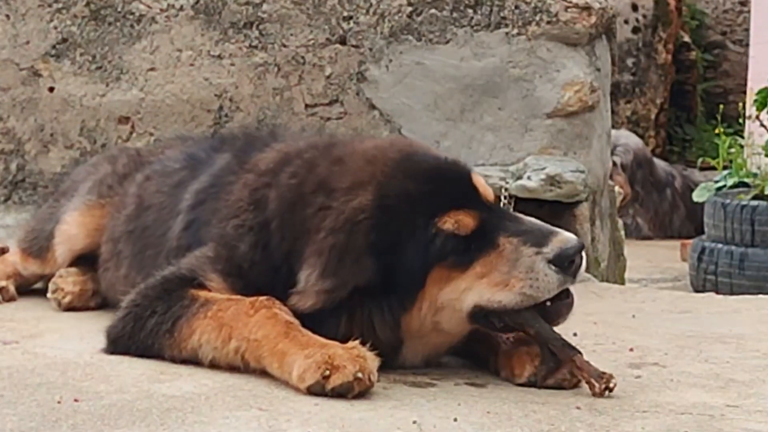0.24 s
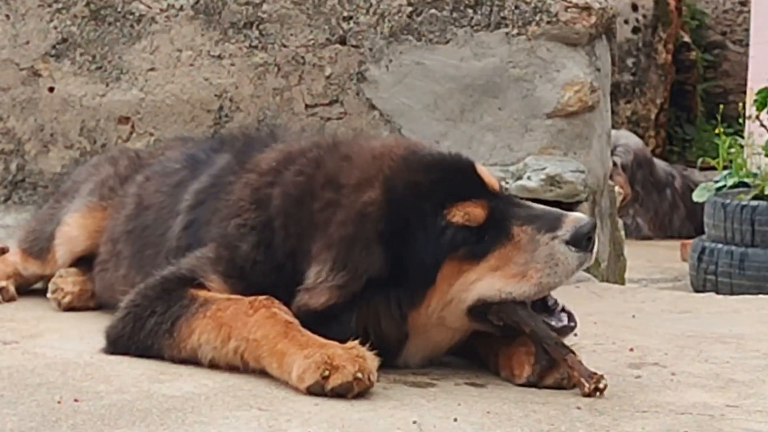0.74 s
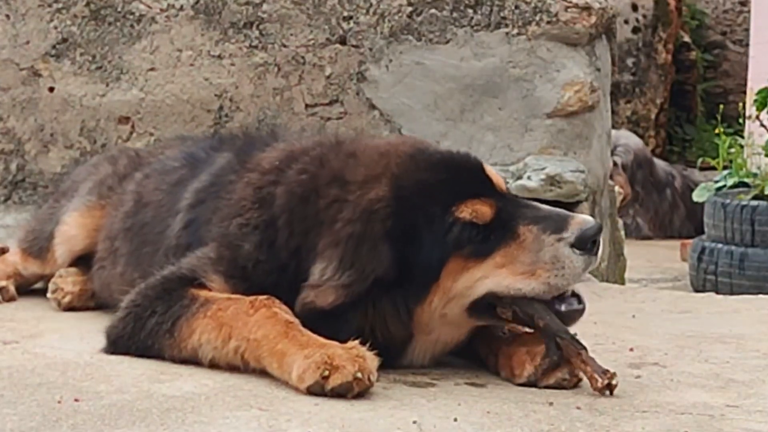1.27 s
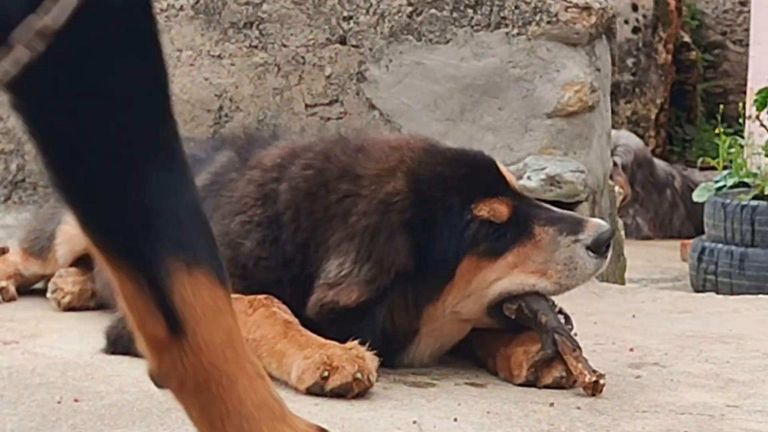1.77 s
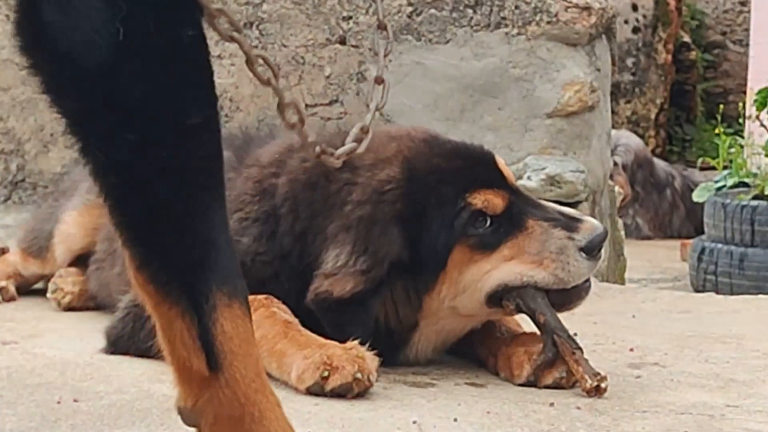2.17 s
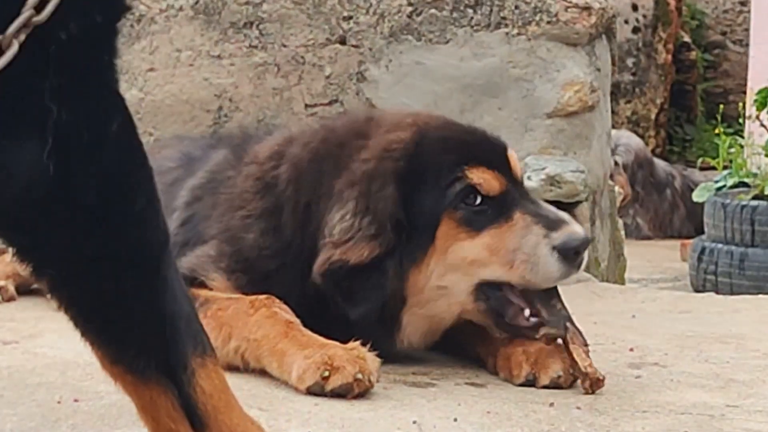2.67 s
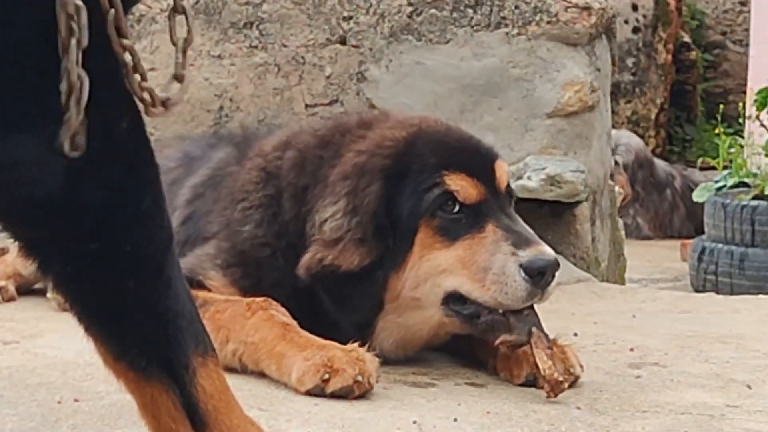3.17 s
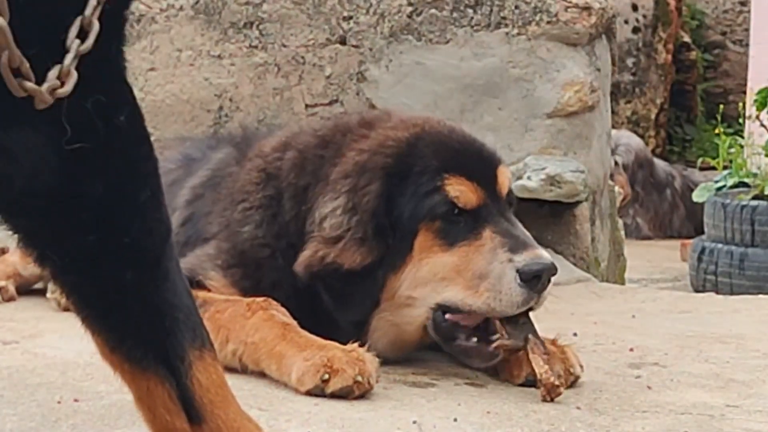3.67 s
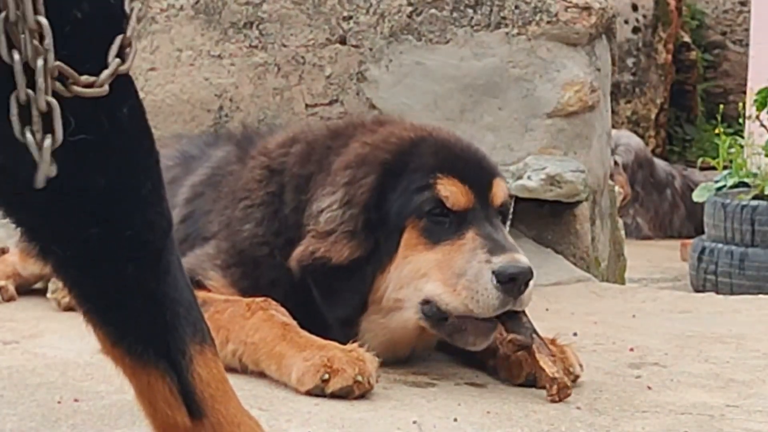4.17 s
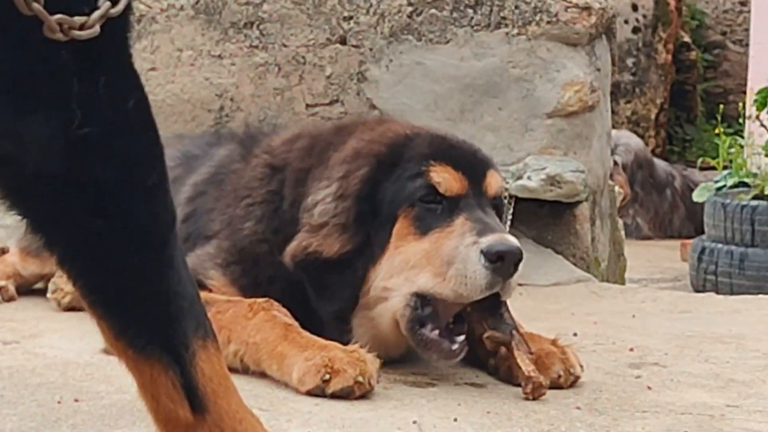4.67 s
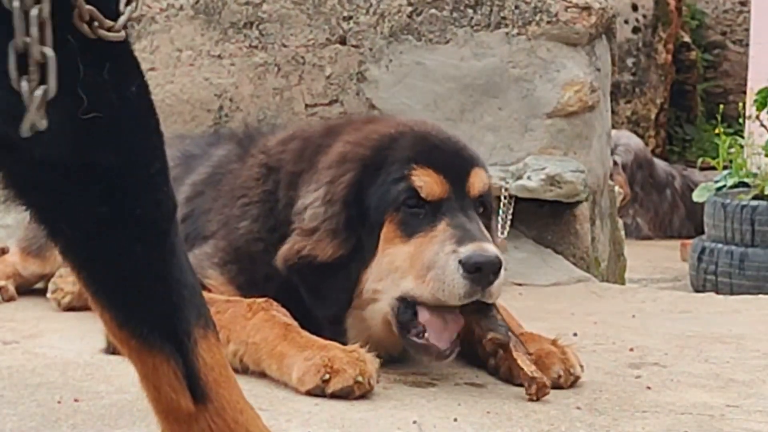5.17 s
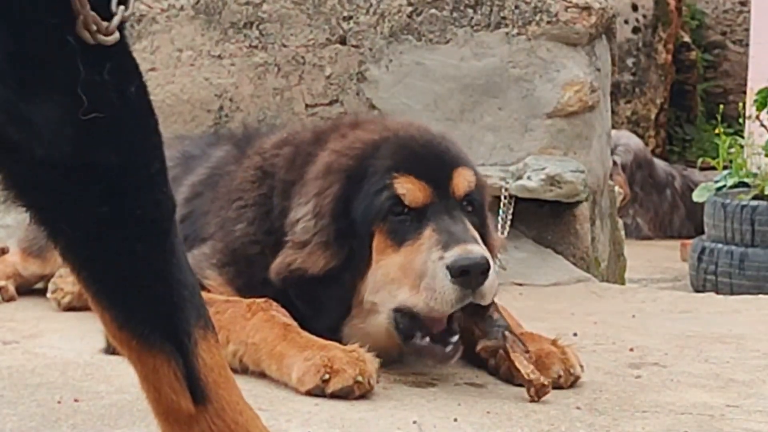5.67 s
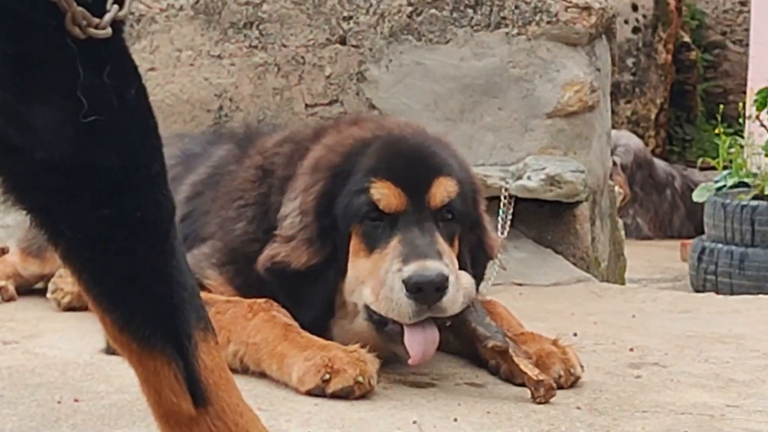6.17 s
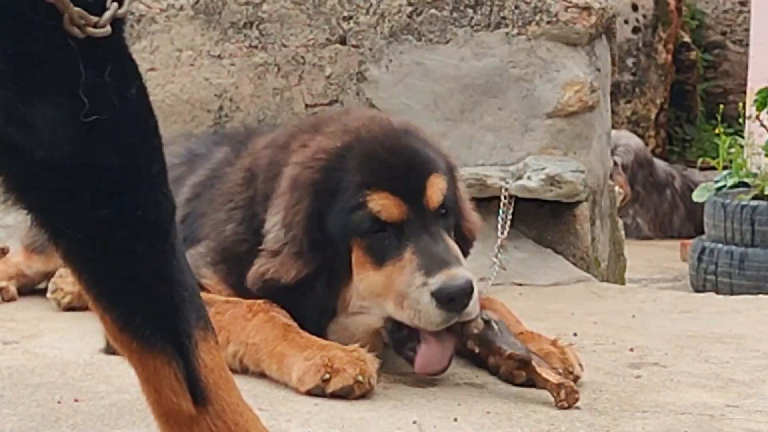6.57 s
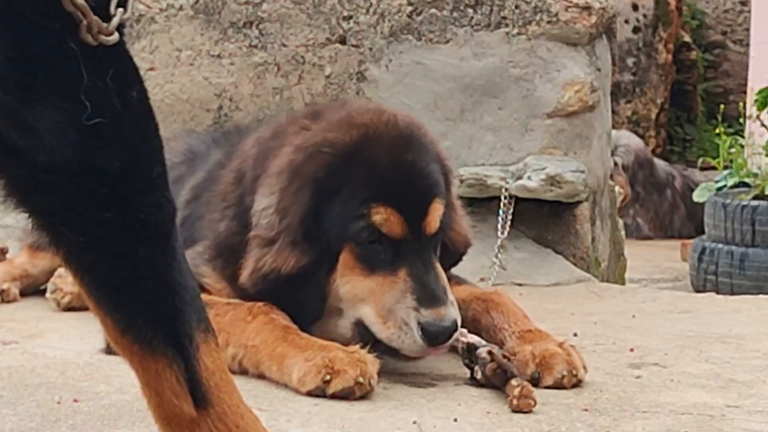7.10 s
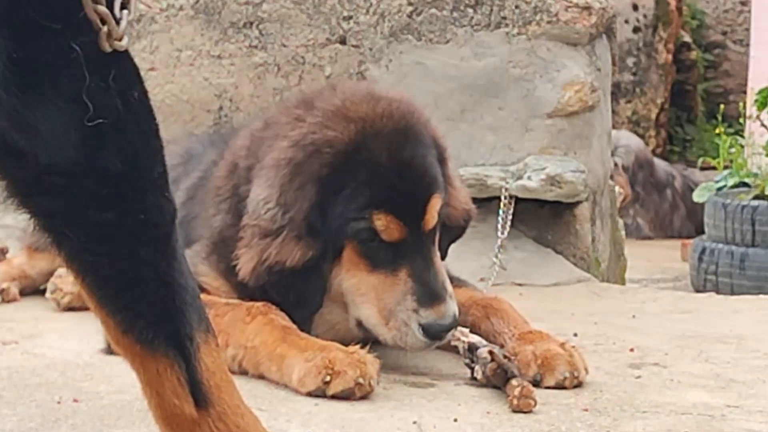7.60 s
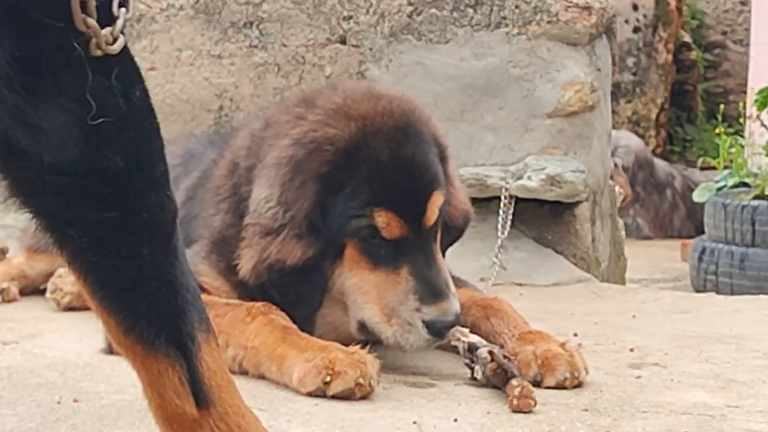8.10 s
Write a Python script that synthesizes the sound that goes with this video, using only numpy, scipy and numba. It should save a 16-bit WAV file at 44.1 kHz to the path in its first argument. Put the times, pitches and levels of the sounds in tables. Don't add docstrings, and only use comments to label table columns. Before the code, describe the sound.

Close, rough puppy growls swell and fade with sniffs and small whines between, over birdsong, chain clicks and faint insect hiss outdoors.

```python
import sys
import numpy as np
from scipy import signal
from scipy.fft import rfft, irfft, next_fast_len
from scipy.io import wavfile
from scipy.ndimage import uniform_filter1d
from numba import njit

SR = 44100
rng = np.random.default_rng(int(sys.argv[2]) if len(sys.argv) > 2 else 0)


def wav_record(signal):
    frames = np.transpose(np.atleast_2d(signal))
    bounded = np.clip(frames, -1, 1)
    quanta = np.round(bounded * 32767).astype(np.int16)
    wavfile.write(sys.argv[1], SR, quanta)


def gain_from_decibels(decibels):
    exponent = np.asarray(decibels, float) / 20
    return 10 ** exponent


N = 368087


def shape(x, hz, gain):
    size = next_fast_len(N)
    f = np.log(np.arange(size // 2 + 1) * SR / size + 1)
    return irfft(rfft(x, size) * np.interp(f, np.log(hz), gain), size)[..., :N]


def even(x, span=0.19):
    return x / np.sqrt(uniform_filter1d(x ** 2, int(span * SR), axis=-1) + 1e-12)


def ring(x, hz, width, order=1):
    band = [hz - width / 2, hz + width / 2]
    return signal.sosfilt(signal.butter(order, band, "band", fs=SR, output="sos"), x)


def walk(rate):
    k = int(SR / rate)
    return uniform_filter1d(np.repeat(rng.standard_normal(N // k + 1), k), k)[:N]


def swell(rows, slope_db=-13):
    t = np.arange(N) / SR
    gains = []
    for peak, rise, fall, db, *_ in rows:
        away = np.maximum((peak - t) / rise, (t - peak) / fall).clip(0, 9)
        gains.append(gain_from_decibels(db + slope_db * away))
    return np.array(gains)


def yard_echo(t60, first, patchy_db=0.):
    t = np.arange(int(.6 * SR)) / SR
    slaps_db = patchy_db * np.repeat(rng.standard_normal((2, len(t) // 60 + 1)), 60, axis=1)[:, :len(t)]
    tail = rng.standard_normal((2, len(t))) * gain_from_decibels(-60 * t / t60 + slaps_db) * (t > first)
    return tail / np.sqrt(np.sum(tail ** 2, axis=1, keepdims=True))


# (start [s], end [s], throat against chest [dB])
GROWLS = [
    (-.05, 0.327, 5),
    (1.117, 1.755, 7),
    (2.451, 3.542, 8.5),
    (4.236, 5.376, 6.5),
    (5.989, 6.713, 2.5),
    (7.123, 7.653, -2),
]
# (time [s], effort [dB], jaw opening [dB])
JAW = [
    [(0, -39.5, 2.5), (.07, -37, 2.5), (.3, -38, -3)],
    [(1.16, -33, 0), (1.33, -40, 6), (1.67, -40, 6), (1.74, -40.5, 4)],
    [(2.47, -30.5, -2), (2.635, -35, 3.5), (2.665, -32.5, 8), (2.77, -30, 3.5), (2.85, -29, -5),
     (3.07, -26.5, -8), (3.21, -31, -3.5), (3.3, -31.5, -3), (3.51, -33, -4.5)],
    [(4.27, -30, 1.5), (4.58, -29, 3.5), (4.8, -32, 3.5), (4.92, -31, -4.5), (5.15, -31.5, -2.5),
     (5.22, -32.5, 1), (5.3, -35.5, 3.5), (5.36, -25, -10.5)],
    [(6.02, -28.5, -3), (6.19, -33, 2.5), (6.255, -24.5, -14.5), (6.5, -30, -7), (6.69, -34, -11)],
    [(7.15, -29, -16.5), (7.23, -29, -8), (7.33, -32.5, -21), (7.63, -31, -20.5)],
]
# (time [s], fold rate [Hz])
FOLD_HZ = [
    [(0, 185.5), (.18, 191.3), (.32, 182.2)],
    [(1.13, 200), (1.2, 210.6), (1.32, 195.1), (1.74, 184.3)],
    [(2.47, 240.3), (2.77, 245.6), (3.05, 231.7), (3.15, 214.2), (3.53, 205)],
    [(4.25, 245.5), (4.54, 236.6), (5.05, 214), (5.2, 227.9), (5.36, 218.2)],
    [(6.0, 205.8), (6.06, 223.8), (6.28, 221), (6.5, 212.2), (6.7, 217.6)],
    [(7.14, 202.7), (7.27, 199.4), (7.36, 189.7), (7.47, 200.3), (7.64, 191.5)],
]
# (drawn back [dB], extra snarl at the start [dB], change up to the end [dB])
LIPS = [
    (-12, -2, 9),
    (-9.5, 4.5, 3),
    (-5.5, 5, -6),
    (-4.5, 1, -8),
    (-10.5, 3, -9.5),
    (-11.5, -11, 5.5),
]
ATTACK_S, RELEASE_S, EDGE_DB = 0.033, 0.03, -11
THROAT_PER_JAW, MOUTH_PER_JAW = 0.12, 0.89
SNARL_S, WOBBLE = 0.21, .018
FLAP_STOPS_S = 0.03


def effort():
    t = np.arange(N) / SR
    which = np.searchsorted([g[1] for g in GROWLS[:-1]], t)
    start, end, throat_db = np.array(GROWLS)[which].T
    s, effort_db, jaw_db = np.concatenate(JAW).T
    effort_db, jaw_db = np.interp(t, s, effort_db), np.interp(t, s, jaw_db)
    done = ((t - start) / (end - start)).clip(0, 1)
    edge = np.maximum(1 - (t - start) / ATTACK_S, 1 - (end - t) / RELEASE_S).clip(0, 1)
    gate = (np.minimum(t - start, end - t) / .008).clip(0, 1)
    hz = np.interp(t, *np.concatenate(FOLD_HZ).T) * (1 + WOBBLE * walk(8))
    lips_db, snarl_db, change_db = np.array(LIPS)[which].T
    snarl = snarl_db * np.exp(-(t - start).clip(0) / SNARL_S)
    mouth_db = lips_db + MOUTH_PER_JAW * jaw_db + change_db * done + snarl
    flapping = ((end - FLAP_STOPS_S - t) / 0.016).clip(0, 1)
    chest_db = effort_db + EDGE_DB * edge
    return gate, which, flapping, hz, chest_db, throat_db + THROAT_PER_JAW * jaw_db, jaw_db, mouth_db


@njit
def larynx(hz, flap_hz, jitter, scatter, fall, uneven, snap, chance):
    pulses, slaps = np.zeros(len(hz) + 1), np.zeros(len(hz))
    p, q = 0., 0.
    k, m, size, drop = 0, 0, 1., 1.
    for i in range(len(hz)):
        step = hz[i] * (1 + jitter[i] * chance[k, 0]) / SR
        p += step
        q += flap_hz[i] * (1 + jitter[i] * chance[m, 1]) / SR
        if snap[i] > 0:
            p, q = 1., 1.2
        if p >= 1:
            p, k, size, drop = p - 1, k + 1, size * drop, fall[i] ** 1.5
            one = size * 10 ** (min(uneven * chance[k, 3], uneven) / 20)
            if q >= 1:
                q, m = q - 1, m + 1
                size, drop = max(snap[i], 10 ** (scatter[i] * chance[m, 2] / 20)), fall[i] ** .6
                one = size
                slaps[i] = size
            pulses[i] += one * p / step
            pulses[i + 1] += one * (1 - p / step)
    return pulses[:-1], slaps


@njit
def glide(x, hz, width):
    y, b, l = np.empty(len(x)), 0., 0.
    for i in range(len(x)):
        g, k = np.tan(np.pi * hz[i] / SR), width[i] / hz[i]
        v = (b + g * (x[i] - l)) / (1 + g * (g + k))
        b, l, y[i] = 2 * v - b, l + 2 * g * v, k * v
    return y


WANDER = 0.043


def tract(x, modes, jaw_db, narrow=0.):
    out = 0
    for f, w, db, fall in modes:
        hz = f * (1 + fall * jaw_db) * (1 + WANDER * walk(13))
        width = w * (1 + narrow * jaw_db).clip(.4)
        after = glide(glide(x, hz, 1.4 * width), hz, 3 * width)
        before = glide(after[::-1].copy(), hz[::-1].copy(), 1.71 * width[::-1])[::-1]
        out = out + gain_from_decibels(db + 63 * fall * jaw_db) * before / np.sqrt(w)
    return even(out, span=0.15)


# (pitch [Hz], left minus right [dB], left leads by [rad])
PORTS = [(60, 0.5, .1), (200, 0, 0.33), (408, 0, 0.37), (740, 3.5, 1), (1330, 7.5, 1), (2330, 5.5, 0.66),
         (4400, 17, 0.49)]


def at_the_ports(voice):
    f, db, lead = np.transpose(PORTS)
    tilt = gain_from_decibels(db / 2) * np.exp(.5j * lead)
    suck = np.exp(-1.15j)
    return np.array([shape(voice, f, suck * tilt), shape(voice, f, suck / tilt)])


# (flap rate [Hz], period scatter [share], size scatter [dB],
# fall from one closure to the next [ratio], breath [share])
ROUGHNESS = [(86, .07, 1.8, .45, .03), (80, .06, 1.5, .4, .02), (97, .055, 1.3, .58, .015),
             (92, .055, 1, .5, .012), (92, .05, 1.4, .6, .02), (97, .05, 2, .6, .02)]
FLAP_DB = [-1, 1, -3, -3, -6, -9]
# (time [s], peak [dB], boost [dB])
SNAPS = [(0.073, -17, 1.5), (0.118, -16, 0), (0.275, -19, 0.5), (1.15, -21, 3), (1.181, -11, 7),
         (1.215, -15, 3.5), (1.249, -17, 2), (1.285, -17, 7.5), (1.336, -19, -4.5), (1.364, -18, -2),
         (1.483, -17, -1.5), (1.564, -17, -1), (1.697, -18, 3.5), (2.565, -13, 4), (2.625, -12, -1.5),
         (2.655, -10, -0.5), (2.929, -11, 6.5), (2.96, -16, 1.5), (4.261, -13, 1), (4.375, -13, 4),
         (4.404, -10, 2.5), (4.461, -5, -3.5), (4.533, -12, 2.5), (4.637, -8, 1), (4.814, -16, 3.5),
         (5.208, -14, 3), (5.253, -13, 7), (6.05, -17, 1), (6.16, -14, 3.5), (6.197, -16, 3)]
# (time [s], half width [s], level [dB])
BREAKS = [
    (0.241, 0.0094, -10),
    (1.301, 0.017, -8.5),
    (1.353, 0.0052, -6),
    (1.632, 0.0051, -8.5),
    (7.449, 0.01, -13),
]
# (pitch with mouth wide open [Hz], width [Hz], level [dB], fall per dB of closing [share])
THROAT = [(420, 140, 6.5, 0.), (480, 510, -6, 0.012)]
TONGUE = [(689.6, 81, -0.5, 0.0029), (910, 106, -5, 0.0089), (1058, 97, -4.5, 0.014)]
MOUTH = [(1251, 150, 1, 0.0035), (1585, 140, 1.5, 0.0069), (1790, 125, -0.5, 0.00038),
         (1950, 220, -2.5, 0.0071), (2456, 320, -8, 0.0016), (3200, 3400, -20.5, 0.0054)]
STEADY_PER_JAW, NARROW_PER_JAW, UNEVEN_DB = .025, 0.047, 5.5
SNAP_LAG_S, CHEST_LEAD_S = .001, 0.0017


def puppy():
    gate, which, flapping, hz, chest_db, throat_db, tongue_db, mouth_db = effort()
    flap_hz, jitter, scatter, fall, breath = np.array(ROUGHNESS)[which].T.copy()
    jitter *= (1.97 + STEADY_PER_JAW * tongue_db).clip(.5)
    snap, snaps = np.zeros(N), np.array(SNAPS)
    snap[((snaps[:, 0] + SNAP_LAG_S) * SR).astype(int)] = gain_from_decibels(snaps[:, 2])
    chance = rng.standard_normal((N // 100, 4)).clip(-2, 2)
    pulses, slaps = larynx(hz, flap_hz, jitter, scatter, fall, UNEVEN_DB, snap, chance)
    puff = signal.lfilter([1], [1, -np.exp(-1 / (.004 * SR))], pulses) * rng.standard_normal(N)
    sharp = 0.048 * pulses + 0.15 * slaps + breath * puff

    jaw_db = mouth_db.clip(-30, 0)
    chest = tract(pulses, [(199.5, 93, 0, 0.0024)], jaw_db)
    flap = tract(slaps, [(96.6, 50, 0.0053, 0.009)], jaw_db)
    body = chest + gain_from_decibels(np.array(FLAP_DB)[which]) * flapping * flap
    throat = tract(pulses + breath * puff, THROAT, tongue_db, narrow=NARROW_PER_JAW)
    tongue = tract(sharp, TONGUE, jaw_db)
    mouth = tract(np.roll(sharp + 0.05 * slaps, 30), MOUTH, jaw_db)
    voice = np.roll(body, -int(CHEST_LEAD_S * SR)) + gain_from_decibels(throat_db) * throat
    voice = voice + gain_from_decibels(tongue_db) * tongue + gain_from_decibels(mouth_db) * mouth

    t = np.arange(N) / SR
    catch_db = sum(db * np.exp(-((t - s) / w) ** 4) for s, w, db in BREAKS)
    voice = shape(voice * gate * gain_from_decibels(chest_db + catch_db), [40, 75], [.15, 1.])
    thin = shape(voice, [100, 400], [.1, 1.])
    walls = signal.fftconvolve(thin[None], yard_echo(t60=0.66, first=0.0032), axes=1)
    return at_the_ports(voice) + gain_from_decibels(-21) * walls[:, :N]


# (pitch [Hz], level [dB per Hz])
YARD = [(22, -2), (45, -8.5), (90, -6), (140, -12.5), (280, -11.5), (330, -16), (1300, -28.5),
        (2700, -21.5), (3350, -25.5), (3700, -26.5), (4400, -24.5), (6900, -20), (7900, -29), (8800, -45),
        (13500, -38.5), (14600, -65)]
# (pitch [Hz], level [dB])
HUM = [
    (95, -58),
    (138, -56.5),
    (274, -62.5),
]
YARD_DB = -46.5
INSECT_HZ, INSECT_WIDTH_HZ, INSECT_DB = 3976, 390, -54


def yard():
    f, db = np.transpose(YARD)
    mid, side = rng.standard_normal((2, N))
    side = shape(side, [40, 130, 600], [.7, .25, 1.])
    air = shape(mid + side * np.array([[1], [-1]]), f, gain_from_decibels(db))
    air *= gain_from_decibels(YARD_DB + np.linspace(1.5, -1.5, N) + walk(9)) / air.std()
    chirr = even(ring(rng.standard_normal((2, N)), INSECT_HZ, INSECT_WIDTH_HZ, order=2))
    insects = gain_from_decibels(INSECT_DB + 1.7 * walk(14)) * chirr
    t = np.arange(N) / SR
    hum = sum(1.18 * gain_from_decibels(db + 2.8 * walk(6)) * np.sin(2 * np.pi * hz * t) for hz, db in HUM)
    return air + insects + hum


# (time [s], peak [dB], knock against the tick [dB], knock pitch [Hz])
CLICKS = [(0.1184, -50, 16, 650), (0.196, -40.5, 27.5, 1470), (0.558, -46, 10, 1070),
          (1.0135, -37.5, 4.5, 692), (1.395, -34, -6, 1500), (1.486, -33, -10, 1500),
          (1.787, -34, -10, 1500), (1.6585, -52, 32, 1070), (2.127, -34, 2, 2700), (2.1864, -24, 6, 2730),
          (2.545, -33, -9, 627), (3.031, -33, 3, 657), (3.231, -17, -19, 758.7), (3.254, -23, -13, 595.4),
          (3.279, -34, 0, 964), (3.3024, -26, -4, 960), (3.316, -28, -5, 650.2), (3.135, -40, -8, 900),
          (3.405, -40, -5, 900), (3.425, -41, -4, 900), (3.6994, -57, 22.5, 740), (3.972, -28, -10, 1500),
          (4.9234, -20, -37, 655), (5.877, -27, -6, 2007), (6.7062, -41, -15, 610), (6.8404, -47, -8, 649)]
LINK_HZ = 7450


def clicks():
    size = 2000
    out, t = np.zeros((2, N + size)), np.arange(size) / SR
    noises = rng.standard_normal((len(CLICKS), 2, size))
    for (s, db, knock_db, knock_hz), noise in zip(CLICKS, noises):
        link_hz = LINK_HZ * (1 + .06 * noise[0, 0])
        metal = np.sin(2 * np.pi * link_hz * t) * gain_from_decibels(-60 * t / 0.012)
        tick = 0.58 * ring(noise * gain_from_decibels(-60 * t / 0.022), 6700, 12000) + .25 * metal
        thud = np.sin(2 * np.pi * knock_hz * t) * gain_from_decibels(-60 * t * knock_hz / 26)
        knock = 0.8 * ring(noise[0] * gain_from_decibels(-60 * t / 0.013), 2060, 3600, order=2) + thud
        i = int(s * SR)
        out[:, i:i + size] += gain_from_decibels(db) * (tick / abs(tick).max() + gain_from_decibels(knock_db) * knock / abs(knock).max())
    return out[:, :N]


# (peak time [s], rise [s], fall [s], level [dB], duller part against it [dB])
SCUFFS = [(.556, 0.033, 0.04, -46.5, 3.5), (.8, 0.21, 0.49, -56, -20), (1.02, 0.039, 0.082, -45, -3),
          (1.749, 0.049, 0.044, -34.5, -1), (2.05, 0.74, 0.11, -54.5, -4), (2.22, 0.043, 0.049, -39.5, 8),
          (2.41, 0.2, 0.032, -47, 3.5), (3.74, 0.13, 0.086, -60, 1), (4.08, .12, 0.11, -57.5, 11.5),
          (5.84, 0.059, 0.045, -53, 3.5), (6.86, 0.024, 0.025, -60.5, 16)]
SCUFF_HZ, SCUFF_SLOPE_DB = 470, -12.5


def scuffs():
    gains = swell(SCUFFS, slope_db=SCUFF_SLOPE_DB)
    grit = rng.standard_normal((2, N)) * gain_from_decibels(3.6 * walk(120))
    rub = gains.sum(axis=0) * even(ring(grit, 1620, 1500, order=2))
    dull = gain_from_decibels(np.array(SCUFFS)[:, -1]) @ gains * even(ring(grit, SCUFF_HZ, 300))
    return rub + dull


CALLERS = {"plunge": [(.633, .026, 4400, -41.5), (1.18, .05, 5140, -42)], "arch": [(.665, 0.036, 3880, -48),
           (.922, 0.025, 5600, -34), (1.045, 0.031, 6630, -35.5), (1.237, 0.035, 4113, -39),
           (2.445, .048, 4132, -49.5), (4.855, 0.051, 4220, -41)], "slide": [(2.011, 0.08, 5110, -47),
           (2.28, 0.03, 5844, -37), (2.58, 0.038, 4730, -46), (5.096, 0.012, 5204, -40),
           (1.652, 0.0095, 6300, -45), (1.735, 0.012, 6700, -28.5), (1.9, 0.019, 6200, -38),
           (1.96, 0.014, 6400, -44), (5.35, 0.015, 5900, -43), (5.262, 0.012, 5380, -37),
           (5.3, 0.0098, 4770, -38), (5.48, 0.015, 7087, -39)], "rise": [(2.094, 0.062, 5890, -36.5),
           (2.32, 0.045, 7080, -41), (6.866, 0.017, 5850, -44), (7.38, 0.136, 2780, -52),
           (7.884, 0.026, 5870, -49)], "hook": [(2.231, 0.044, 7000, -43)],
           "flat": [(1.085, 0.032, 6700, -45), (2.509, 0.025, 4700, -44.5), (5.618, 0.041, 2680, -43),
           (7.78, 0.108, 2800, -55.5), (7.771, 0.15, 4500, -54)]}
SHAPES = {"plunge": (1.4, .75), "slide": (1.12, .9), "hook": (1.22, 1), "flat": (1.01, 0.98),
          "arch": (.93, .94), "rise": (0.95, 1.03), "lift": (.91, 1.1), "climb": (.85, 1.3),
          "flick": (1.1, 0.94)}
WARBLE = {"flat": [(0, 0.061, 6060, -2.5), (.4, .09, 5520, -5.5), (.56, 0.107, 5950, 2.5),
          (1.1, .05, 6790, -3.5)], "slide": [(.905, .03, 6930, 2.5), (1.225, .045, 5500, 1),
          (1.27, .05, 4450, -3)], "lift": [(.615, .06, 6710, 0), (.93, 0.038, 7170, 2),
          (1.0, .06, 4950, -1), (1.055, 0.041, 6140, 3.5)], "climb": [(.49, .06, 5640, -0.5)],
          "hook": [(.245, .15, 4974, 0), (.715, .11, 7210, -1.5), (.825, .11, 5650, 2.5),
          (1.145, .085, 6200, 1)]}
# (start [s], level [dB])
WARBLES = [
    (3.589, -46),
    (6.115, -46),
]
# (time [s], gap to second chirp [s], level [dB], top of first chirp [Hz], top of second [Hz])
TRILL = [
    (1.392, 0.066, -34, 6230, 7200),
    (1.563, 0.059, -28.5, 6700, 6900),
    (1.718, 0.058, -27, 7180, 7200),
    (1.874, 0.054, -27, 7440, 7300),
    (5.011, 0.057, -34.5, 6630, 6740),
    (5.166, .06, -30.5, 7077, 6800),
    (5.319, 0.057, -29, 7900, 6300),
    (5.474, 0.05, -30, 7550, 6900),
]
CHIRP_S, SECOND_S, SECOND_DB = 0.018, .028, -2
CHIRP_HZ, CHIRP_BEND = 5380, 0.327
FLICK_AFTER_S, FLICK_S, FLICK_HZ, FLICK_DB = 0.031, 0.0124, 4450, -7


def notes():
    def note(kind, s, length, hz, db):
        first, last = SHAPES[kind]
        return s, length, hz * first, hz, hz * last, db

    def chirp(s, length, top, db):
        return s, length, CHIRP_HZ, CHIRP_HZ + CHIRP_BEND * (top - CHIRP_HZ), top, db

    out = [note(kind, *row) for kind, rows in CALLERS.items() for row in rows]
    for start, phrase_db in WARBLES:
        for kind, rows in WARBLE.items():
            out += [note(kind, start + dt, length, hz, phrase_db + db) for dt, length, hz, db in rows]
    for s, gap, db, top, second_top in TRILL:
        out.append(chirp(s, CHIRP_S, top, db))
        out.append(note("flick", s + FLICK_AFTER_S, FLICK_S, FLICK_HZ, db + FLICK_DB))
        out.append(chirp(s + gap, SECOND_S, second_top, db + SECOND_DB))
    return out


BIRD_PAN_DB = 1
RISE_DB = 15
HAZE_DB, HAZE_HZ = 0, 2180


def birds():
    song, waver = np.zeros(N), walk(400)
    for start, length, a, b, c, db in notes():
        v = np.linspace(0, 1, int(length * SR))
        u = .2 * v + .8 * v * v * (3 - 2 * v)
        i = int(start * SR)
        hoarse = 0.011 + 0.02 * np.exp(-length / .03) + .05 * (b < 3000)
        hz = a + (4 * b - 3 * a - c) * u + 2 * (a + c - 2 * b) * u ** 2
        phase = 2 * np.pi * np.cumsum(hz * (1 + hoarse * waver[i:i + len(u)])) / SR
        whistle = np.sin(phase) + gain_from_decibels(-48) * np.sin(2 * phase)
        loudness = gain_from_decibels(db) * np.sin(np.pi * v) ** 0.42 * gain_from_decibels(RISE_DB * (hz / b - 1))
        song[i:i + len(u)] += loudness * whistle
    song *= gain_from_decibels(2.5) * gain_from_decibels(3.66 * walk(200))
    leaves = gain_from_decibels(2.5) * yard_echo(t60=0.086, first=0.00243, patchy_db=7.5)
    walls = gain_from_decibels(-4) * yard_echo(t60=0.69, first=0.02)
    blur = song * walk(HAZE_HZ)
    haze = gain_from_decibels(HAZE_DB) * signal.fftconvolve(blur[None], yard_echo(t60=0.37, first=0.0062), axes=1)[:, :N]
    direct = song * gain_from_decibels(np.array([[-7.], [-4.5]]))
    echoes = signal.fftconvolve(song[None], leaves + walls, axes=1)[:, :N]
    return haze + direct + echoes * gain_from_decibels(BIRD_PAN_DB * np.array([[.5], [-.5]]))


# (peak time [s], rise [s], fall [s], level [dB])
SWISHES = [
    (1.488, 0.015, 0.031, -49),
    (1.787, 0.046, 0.023, -43.5),
    (1.9, 0.086, 0.12, -53),
    (2.31, 0.023, 0.0079, -43.5),
    (3.26, 0.016, 0.057, -51.5),
]
CHAIN_PAN_DB = 3


def chain_swish():
    hiss = rng.standard_normal((2, N)) * gain_from_decibels(3.6 * walk(120)) * gain_from_decibels(1.2 * walk(35))
    swish = swell(SWISHES).sum(axis=0) * gain_from_decibels(3) * even(ring(hiss, 9200, 10200, order=6), span=.5)
    return swish * gain_from_decibels(CHAIN_PAN_DB * np.array([[.5], [-.5]]))


# (time [s], level [dB])
GUSTS = [
    (1.9, -77),
    (1.956, -33),
    (1.98, -48),
    (2.17, -59),
    (2.22, -32.5),
    (2.3, -58),
]


def gusts():
    t = np.arange(N) / SR
    s, db = np.transpose(GUSTS)
    gate = np.interp(t, [s[0], s[0] + 0.02, s[-1] - 0.02, s[-1]], [0, 1, 1, 0])
    air = rng.standard_normal((2, N))
    rumble = even(1.7 * ring(air, 43, 21) + ring(air[0], 103, 48), span=1.8)
    return gate * gain_from_decibels(np.interp(t, s, db)) * rumble


# (peak time [s], rise [s], fall [s], level [dB])
SNIFFS = [
    (3.71, 0.058, 0.054, -42),
    (3.86, 0.045, 0.05, -46.5),
    (4.12, 0.39, 0.11, -44.5),
    (5.83, 0.14, 0.14, -40),
]
# (pitch [Hz], width [Hz], level [dB])
NOSE = [(432, 160, -3), (740, 230, -1.5), (1440, 380, -2.5), (1820, 170, -0.5), (2480, 310, -14)]


def sniffs():
    air = rng.standard_normal((2, N)) * gain_from_decibels(4.2 * walk(37))
    air = air[0] + 0.44 * air[1] * np.array([[1], [-1]])
    nose = sum(gain_from_decibels(db) * ring(air, hz, width, order=2) for hz, width, db in NOSE)
    return swell(SNIFFS, slope_db=-12.5).sum(axis=0) * even(nose, span=2.9)


# (peak time [s], rise [s], fall [s], level [dB], pitch [Hz])
MUTTERS = [
    (5.409, 0.039, 0.077, -40.5, 221),
    (6.76, 0.036, 0.037, -44, 236),
    (6.88, 0.063, 0.054, -53.5, 279.7),
    (7.82, 0.062, 0.093, -52, 470),
    (7.93, 0.096, 0.069, -49.5, 382),
]


def mutters():
    wavering_s = np.cumsum(1 + 0.0404 * walk(36)) / SR
    out = 0
    for gain, row in zip(swell(MUTTERS), MUTTERS):
        phase = 2 * np.pi * row[4] * wavering_s
        out = out + gain * (np.sin(phase) + gain_from_decibels(-12.0) * np.sin(2 * phase))
    return out


def scene():
    near = puppy() + clicks() + scuffs() + chain_swish() + sniffs() + mutters()
    return near + yard() + birds() + gusts()


def roll_off(x):
    return signal.sosfilt(signal.butter(12, 15200, fs=SR, output="sos"), x)


def record(dry):
    rounded = np.tanh(1.2 * dry) / 1.2
    top_cut = signal.ellip(8, .2, 70, 14900, fs=SR, output="sos")
    mix = shape(signal.sosfilt(top_cut, rounded), [7700, 8500, 10500], gain_from_decibels(np.array([0, -2., 0.])))
    return roll_off(mix)


dry = scene()
out = record(dry)
wav_record(out)
```